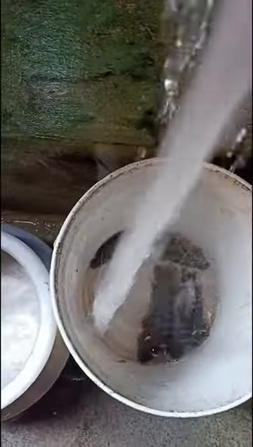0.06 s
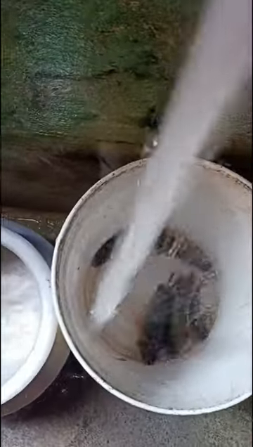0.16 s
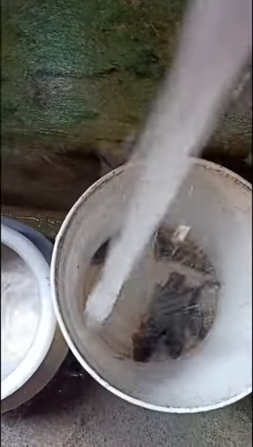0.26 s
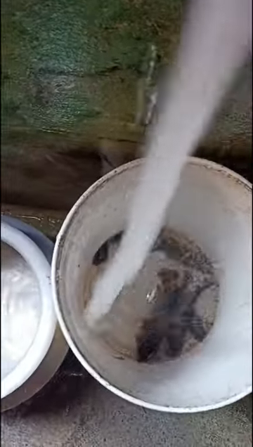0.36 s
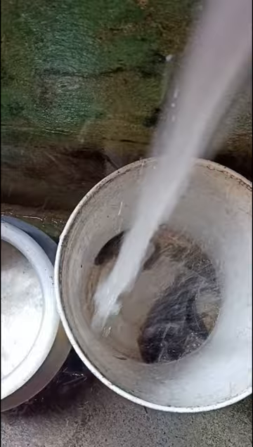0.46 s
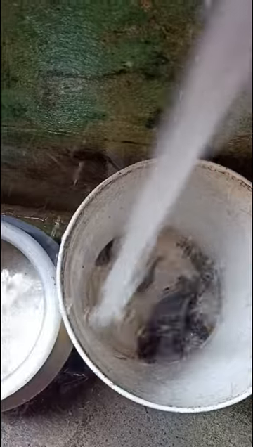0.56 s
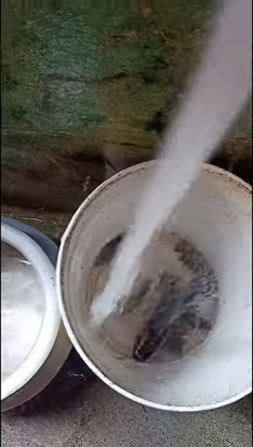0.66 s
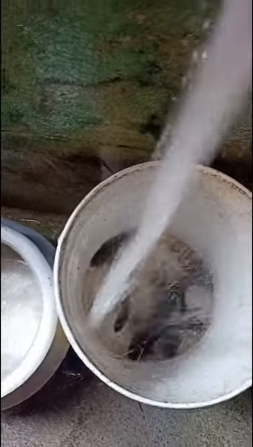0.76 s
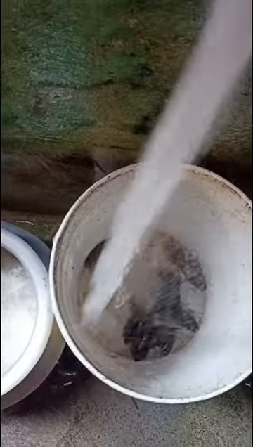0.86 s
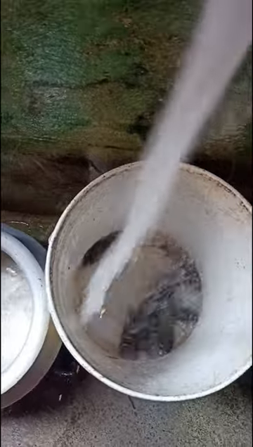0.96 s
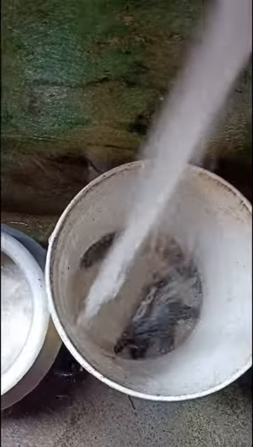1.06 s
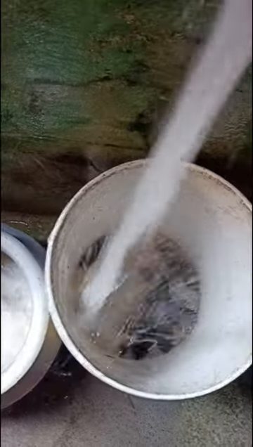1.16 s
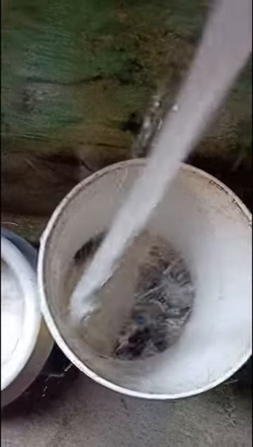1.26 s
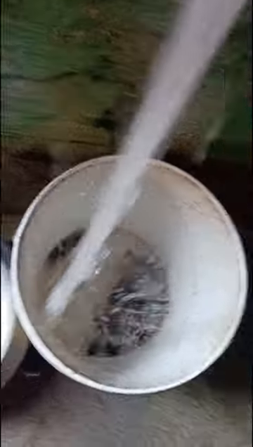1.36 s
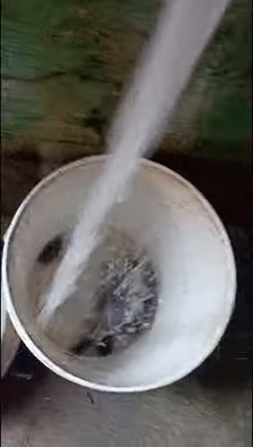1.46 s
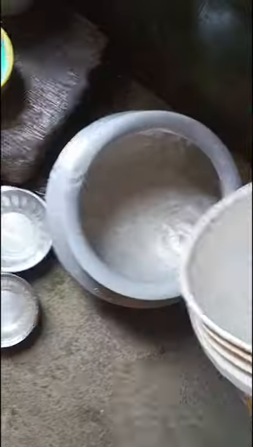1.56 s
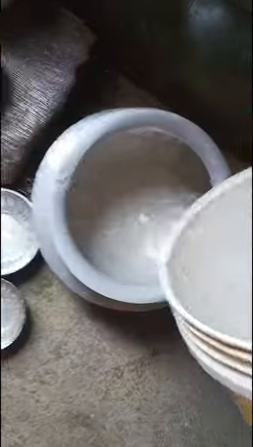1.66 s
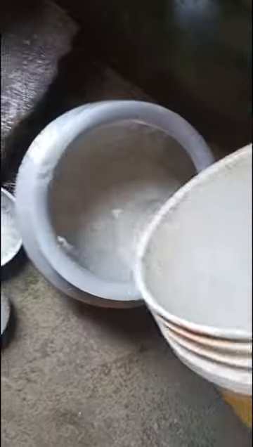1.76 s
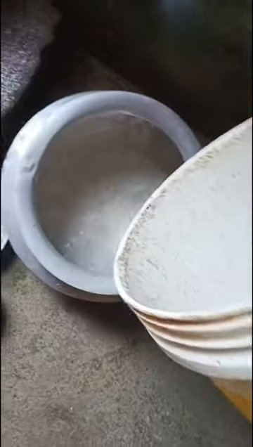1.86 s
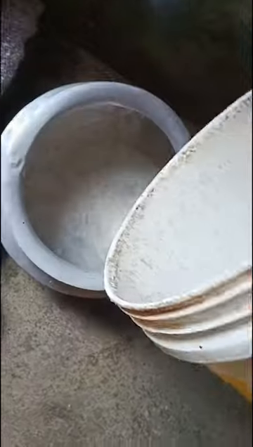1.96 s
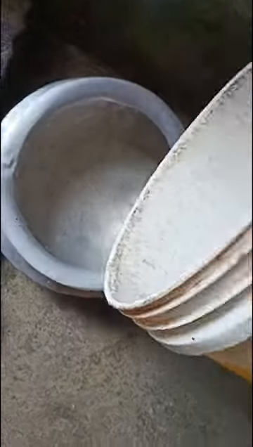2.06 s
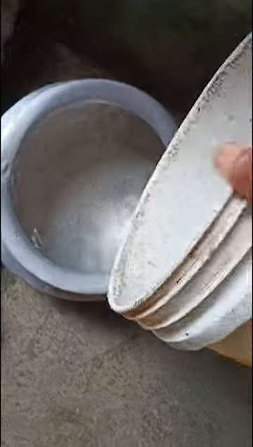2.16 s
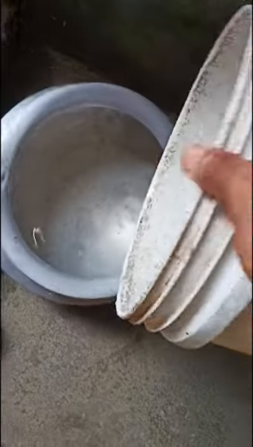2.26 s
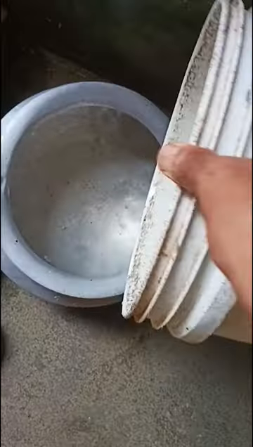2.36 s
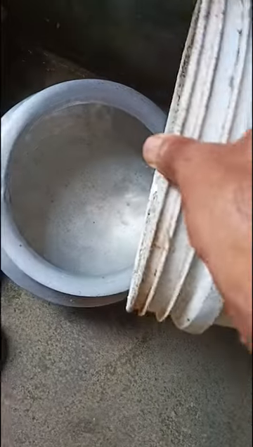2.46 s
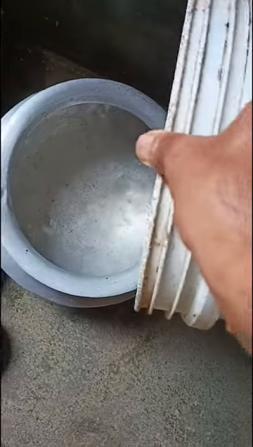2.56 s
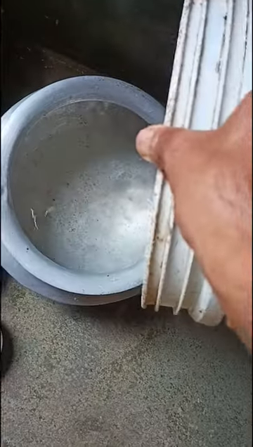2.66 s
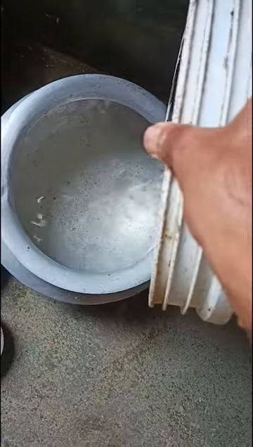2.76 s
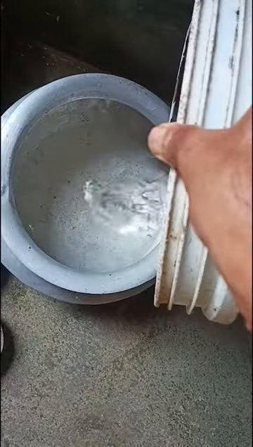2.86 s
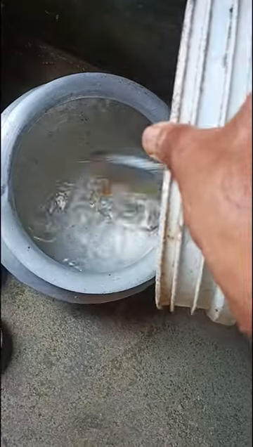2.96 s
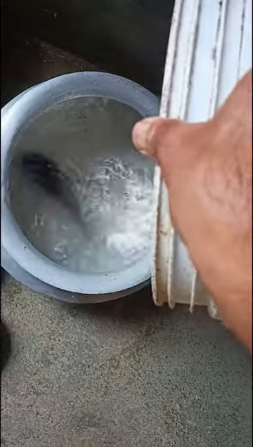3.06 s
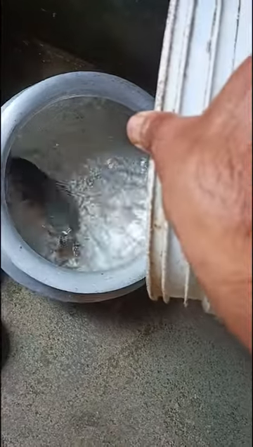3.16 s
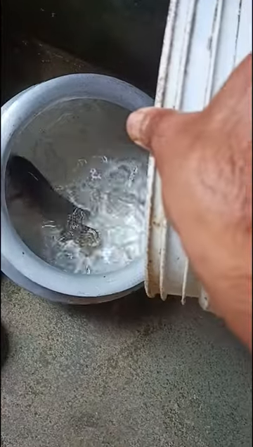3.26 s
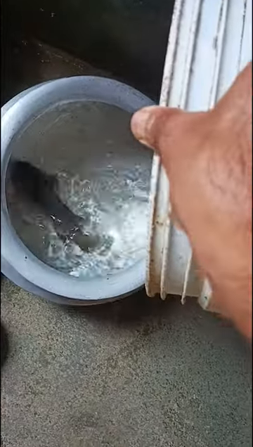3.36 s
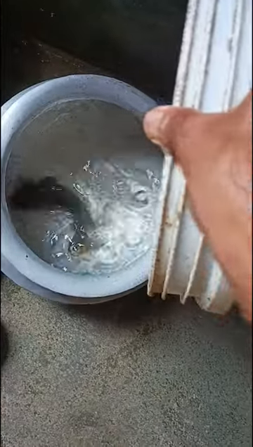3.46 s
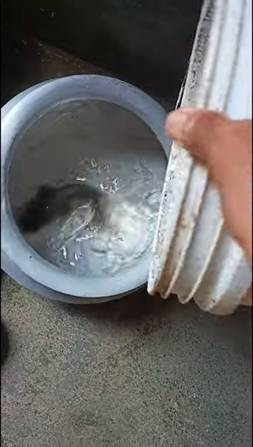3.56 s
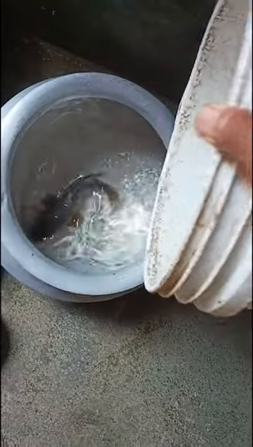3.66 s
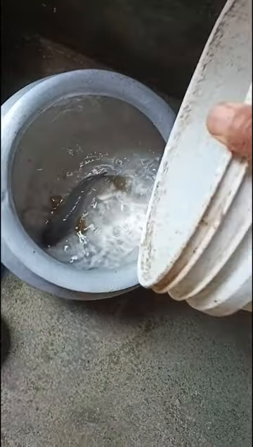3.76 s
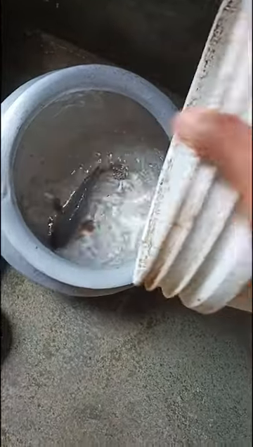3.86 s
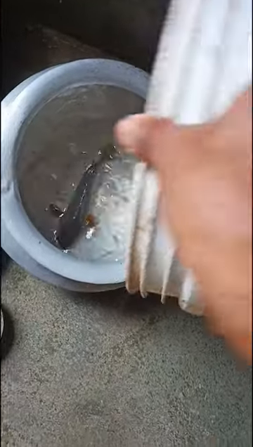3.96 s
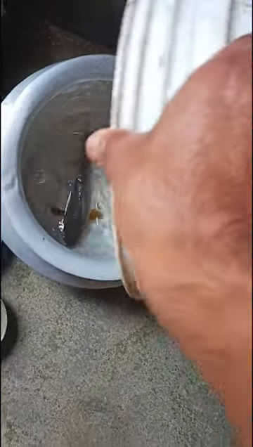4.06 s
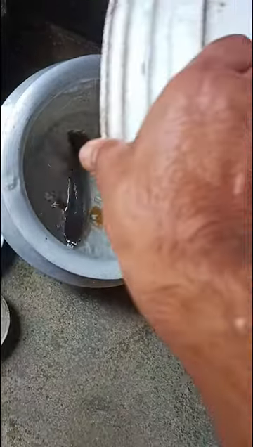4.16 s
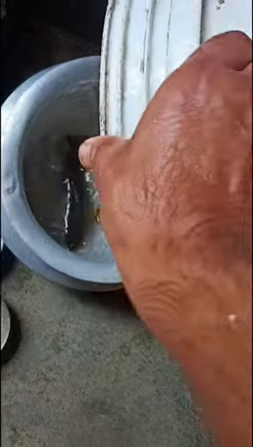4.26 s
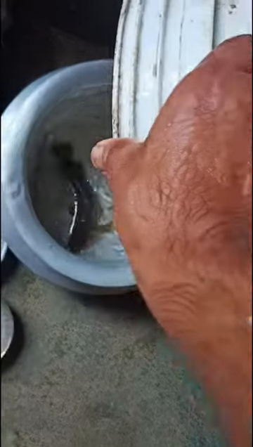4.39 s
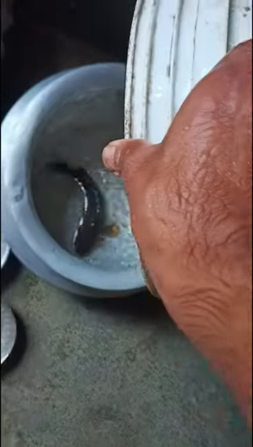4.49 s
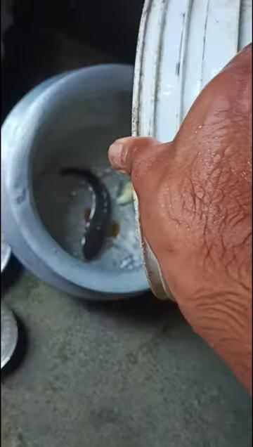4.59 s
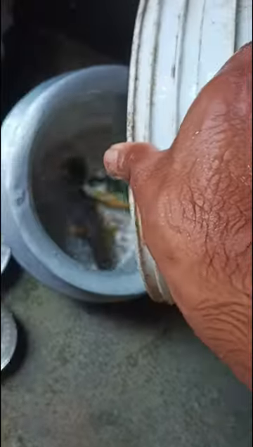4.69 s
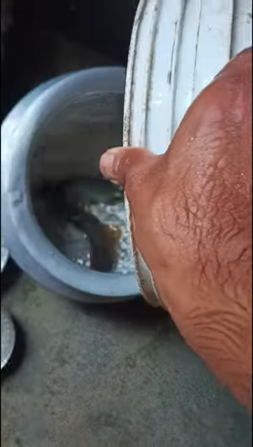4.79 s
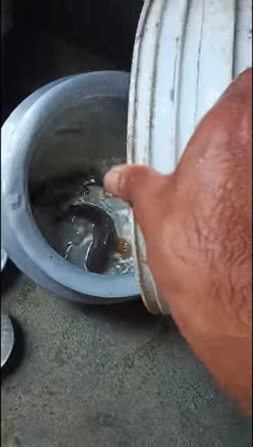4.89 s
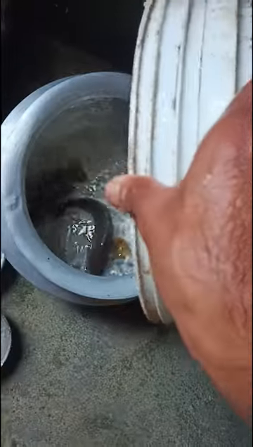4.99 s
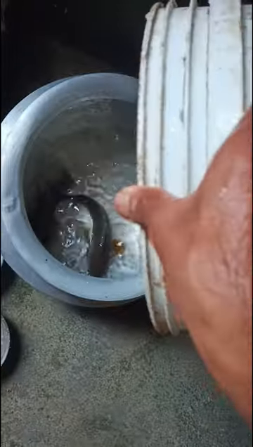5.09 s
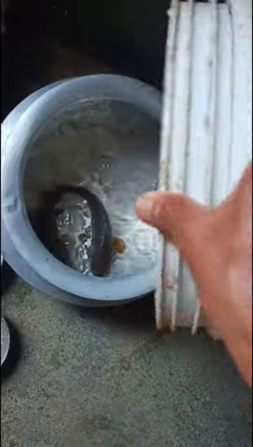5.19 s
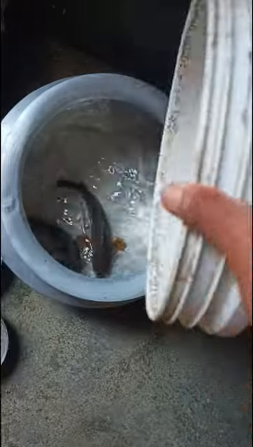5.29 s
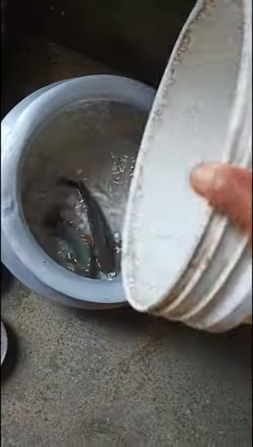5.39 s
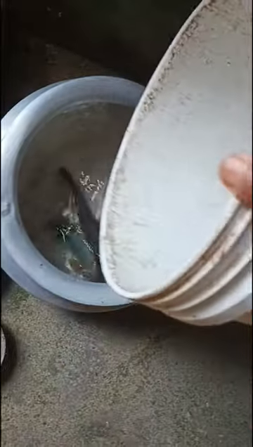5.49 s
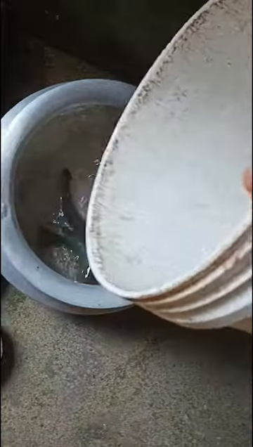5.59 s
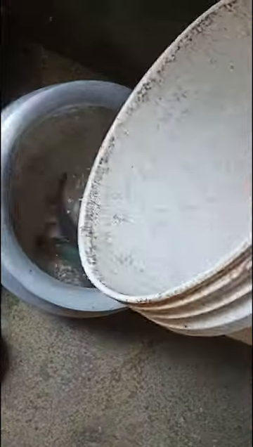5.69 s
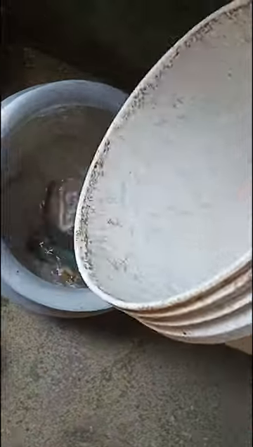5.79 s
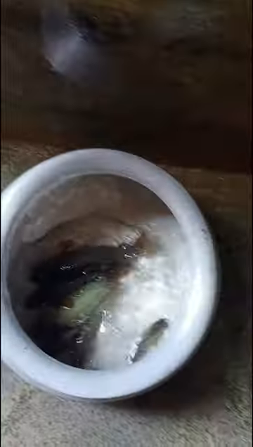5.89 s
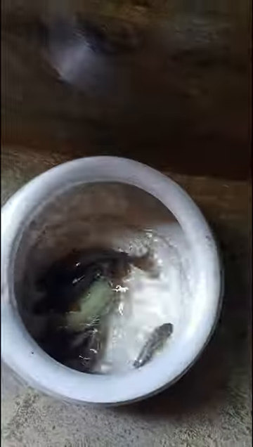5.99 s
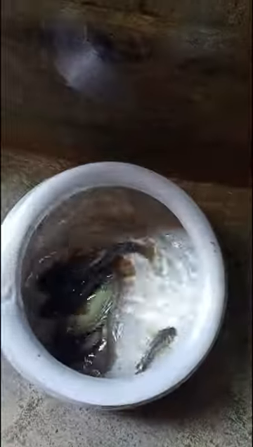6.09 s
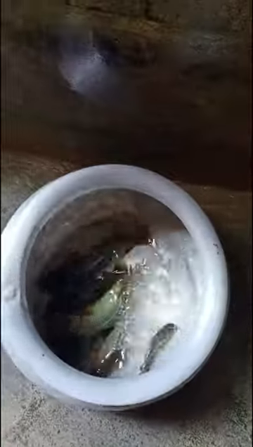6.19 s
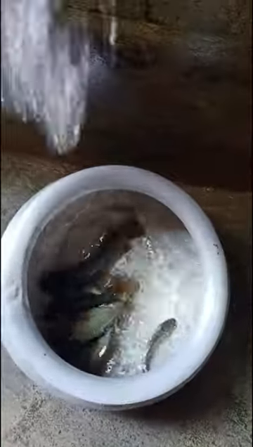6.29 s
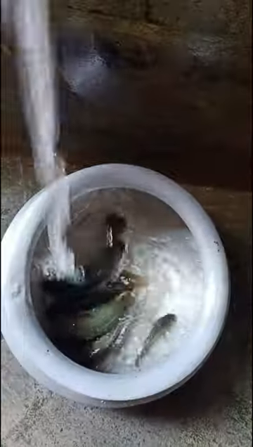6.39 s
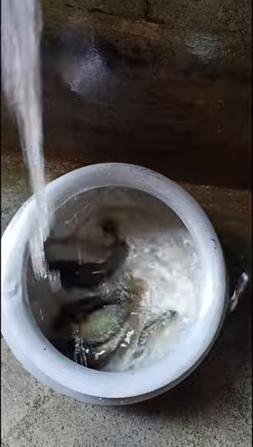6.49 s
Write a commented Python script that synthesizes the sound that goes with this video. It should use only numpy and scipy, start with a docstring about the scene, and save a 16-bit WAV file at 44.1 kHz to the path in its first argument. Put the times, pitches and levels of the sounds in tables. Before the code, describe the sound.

Close up in a small hard-walled space, a strong jet drums and hisses steadily in a plastic bucket, then stops abruptly. After a quiet gap the bucket rim scrapes a metal pot, water gushes in spurts, and fish thump and flap wetly against the metal, which rings faintly. Drops tick, and a thin stream starts pattering at the end.

```python
"""A jet of tap water drums into a plastic bucket of live fish, as shaped noise and bubbles; its sound stops
abruptly at 1.66 s. The bucket is then tipped over an aluminium pot: its rim chatters on the metal, and water
gushes out as clumped drop impacts and bubbles. Fish slide down, thump and flap as struck modes and wet bursts;
the metal rings as decaying modes and drops tick with rising bubbles. At the end a thin stream patters into the
pot."""
import sys
import numpy as np
from scipy import signal
from scipy.io import wavfile

SR = 44100
rng = np.random.default_rng(int(sys.argv[2]) if len(sys.argv) > 2 else 0)


def to_wav(s):
    """Save 16-bit WAV."""
    ch = np.atleast_2d(s).T  # columns
    pcm = np.round(np.clip(ch, -1, 1) * 32767)  # PCM
    wavfile.write(sys.argv[1], SR, pcm.astype(np.int16))


N = 288414
TIME = np.arange(N) / SR  # seconds, whole scene
RING = np.arange(SR // 2) / SR  # seconds, one half-second event

# In every table of a spectrum the level is relative: a later step sets the overall level.
# Still air. Each row: frequency in Hz, density in dB per Hz.
AIR_SPECTRUM = [(15, -67.5), (25, -28.5), (53, -3), (71, -13), (148, -23.5), (246, -18.5), (359, -25.5),
                (666, -26.5), (762, -27), (1020, -37), (1850, -38), (2420, -44.5), (4040, -43), (7700, -56),
                (15500, -53)]
# Thin hiss. Each row: frequency in Hz, density in dB per Hz.
HISS_SPECTRUM = [(5000, -34.5), (8000, -18), (10000, -25.5), (11400, 2), (12600, -12.5), (15500, -18)]
AIR_RMS_DB, HISS_RMS_DB = -63.5, -87.5
# Low rumble of handling the bucket. Each row: time in seconds, relative level in dB.
HANDLING_LEVEL = [(1.7, -62), (2.3, -69), (2.66, -48), (3.05, -66), (3.35, -42), (4.15, -56), (4.85, -54.5),
                  (5.2, -46), (6.0, -48), (6.54, -60.5)]

# Decay of the close walls' echo. Each row: frequency in Hz, t60 in seconds.
ROOM_DECAY = [(100, 0.41), (500, 0.21), (2000, 0.3), (6000, 0.33), (15000, 0.26)]
# Microphone response. Each row: frequency in Hz, gain in dB.
MIC_RESPONSE = [(15, -26.5), (40, -11), (65, -1), (120, 1.5), (15000, -1)]
EDGE_HZ = 15750  # band limit

# The jet's course. Each row: time in seconds, relative drumming level in dB, relative spray level in dB.
JET_LEVELS = [(0, -29, -32.5), (.3, -31, -34), (.55, -29, -33), (.85, -31, -33.5), (1.4, -31, -34),
              (1.65, -31.5, -34)]
JET_STOP_S = 1.659
# The bucket drumming under the jet. Each row: frequency in Hz, density in dB per Hz.
DRUM_SPECTRUM = [(21, -46.5), (35, -21), (97, -5.5), (166, -11.5), (338, -1), (419, -13), (510, -11),
                 (903, -16), (1180, -17.5), (1340, -21.5), (1540, -14.5), (1910, -37.5), (2500, -40),
                 (3250, -48), (5500, -120)]
# The jet's spray. Each row: frequency in Hz, density in dB per Hz.
SPRAY_SPECTRUM = [(1180, -44), (2000, -12.5), (2350, -8.5), (2770, -7.5), (3120, -10.5), (3940, -4),
                  (4320, -9), (4880, -4), (5540, -10), (7680, -14.5), (9590, -7), (11200, 2), (11800, -2),
                  (12700, -13.5), (15500, -22)]
# Resonances of the standing bucket. Each row: frequency in Hz, width in Hz, lift in dB.
BUCKET_RESONANCES = [(358, 130, 3.5), (483, 100, 4), (1200, 85, 7), (1550, 150, 7), (1778, 180, 15.5),
                     (2057, 29, 10.5), (2830, 450, 2), (3590, 60, 6.5), (4300, 850, 1), (5000, 77, 0)]
# The heaviest slugs of water in the jet. Each row: start in seconds, relative peak in dB.
JET_SLUGS = [(0.08, -19), (0.257, -20), (0.379, -23), (0.712, -19.5), (0.83, -24), (1.045, -22.5),
             (1.076, -22.5), (1.287, -20), (1.384, -21.5)]

# Gushes from the tipped bucket. Each row: start in seconds, length in seconds,
# then relative levels in dB of the slosh, the splash, the fine spray and the thin hiss.
GUSH_EVENTS = [(2.358, 0.04, -61, -76.5, -98, -100), (2.484, 0.17, -52, -63, -74, -78),
               (2.567, 0.19, -48.5, -54.5, -69, -79), (3.089, 0.19, -63.5, -59, -59.5, -77),
               (3.235, 0.03, -33.5, -47, -60, -57), (3.274, 0.036, -35, -36.5, -49.5, -72),
               (3.442, 0.19, -41, -53.5, -57, -69), (3.708, 0.13, -53.5, -59.5, -68, -79),
               (3.921, 0.23, -55.5, -67, -76, -80), (4.294, 0.03, -41, -35.5, -57.5, -80),
               (4.48, 0.14, -58, -61, -67.5, -74.5), (4.876, 0.24, -49.5, -51.5, -63.5, -75),
               (5.168, 0.22, -45.5, -51.5, -63.5, -82), (5.551, .19, -46, -58.5, -66.5, -79),
               (5.901, .07, -56, -60, -67.5, -65.5)]
GUSH_RISE_S, GUSH_SAG_DB_PER_S = 0.021, 20
SLOSH_T60_S, SPLASH_T60_S, SPRAY_T60_S, MIST_T60_S = 0.4, 0.51, 1, 0.58  # how each part settles after a gush
# Water sloshing over the rim. Each row: frequency in Hz, density in dB per Hz.
SLOSH_SPECTRUM = [(41, -15.5), (70, -12), (134, -4), (215, 3.5), (284, -2), (445, -3), (613, -3.5),
                  (727, -30.5), (900, -19.5), (1170, -44), (1980, -120)]
# Water splashing in the pot. Each row: frequency in Hz, density in dB per Hz.
SPLASH_SPECTRUM = [(410, -34.5), (700, -2), (868, -12.5), (948, -4.5), (1270, -10.5), (1380, -7.5),
                   (2070, -17), (2920, -24), (3500, -43), (4550, -72), (7700, -120)]
# Fine spray and ticking drops. Each row: frequency in Hz, density in dB per Hz.
FIZZ_SPECTRUM = [(1500, -19.5), (2500, -2.5), (3700, 2), (5200, 1), (6500, -8), (8000, -9), (11300, 1),
                 (12600, -18.5), (15500, -58)]
# Drops thrown by the spray; their peak stands STRAY_DB above the spray's envelope.
STRAY_DROPS_PER_S, STRAY_DB, STRAY_LOW_HZ, STRAY_HIGH_HZ = 17, 13, 2640, 5150

# Fish thumping: the first in the bucket under the jet, the rest in the pot. Each row: start in seconds, # knock
# peak in dB, knock frequency in Hz, peak of the floor's boom in dB.
FISH_THUMPS = [(1.58, -32.5, 90.7, -38), (2.492, -31.5, 210, -51), (2.584, -28.5, 356, -67),
               (2.738, -36, 263, -37), (3.248, -14.5, 420, -30), (3.263, -22, 231, -41),
               (3.479, -15.5, 515, -30.5), (3.596, -24, 466, -34.5), (3.736, -37, 463, -36.5),
               (4.049, -35, 295, -34), (4.365, -18, 480, -11), (4.406, -23, 306, -36),
               (4.482, -31.5, 232, -31.5), (4.749, -41, 162, -46), (4.898, -40, 230, -37.5),
               (4.995, -39.5, 208, -40), (5.142, -24, 275, -18), (5.284, -34, 186, -25),
               (5.360, -29, 223, -32.5), (5.676, -41, 222, -39), (5.752, -39.5, 126, -37.5),
               (5.939, -32.5, 107, -32)]
# Modes a thump wakes in the wall. Each row: frequency in Hz, relative level in dB, t60 in seconds.
WALL_MODES = [(185.4, 1.5, 0.053), (222, -8, 0.074), (320, 2, 0.046), (403, -3, 0.0083), (477, -0.5, 0.05),
              (644, -1.5, 0.054), (920, -54, 0.052), (1167, -6, 0.022), (1480, -21, 0.068)]
# A small wall radiates little bass. Each row: frequency in Hz, gain in dB.
WALL_RADIATION = [(30, -21), (80, -13), (120, -12.5), (170, 2), (15000, -8)]
KNOCK_CYCLES = 20  # a struck spot falls by 60 dB within this many swings
BOOM_HZ, BOOM_T60_S, BOOM_DELAY_S = 191, 0.038, 0.00462  # the floor gives a moment after the knock

# Wet slaps of tails and falling water. Each row: start in seconds, relative peak in dB,
# relative level of the fine spray in dB.
WET_SLAPS = [(2.614, -32, -55), (2.737, -34.5, -68), (3.238, -42, -44.5), (3.479, -24, -65),
             (4.05, -23, -54), (4.47, -27, -56.5), (4.923, -26.5, -47), (4.988, -31.5, -62),
             (5.037, -29, -53), (5.147, -22, -69), (5.185, -23.5, -52), (5.23, -32, -61), (5.255, -42, -69),
             (5.292, -27, -75), (5.363, -19, -46), (5.573, -29, -73), (5.622, -29.5, -61),
             (5.709, -33, -70), (5.965, -40, -68)]
# A wet slap. Each row: frequency in Hz, density in dB per Hz.
SLAP_SPECTRUM = [(80, -55), (170, -22.5), (280, 1), (420, 7.5), (680, 3.5), (1100, 1.5), (1600, -2),
                 (2000, -13.5), (2500, -18.5), (4500, -22.5), (7000, -68), (15000, -43)]
SLAP_T60_S, SLAP_HALVING_DB = 0.075, 8  # t60 at a table peak of -30 dB; a slap this much harder is half as long

# The rim scraping over the pot. Each row: start in seconds, rms level in dB, length in seconds,
# t60 in seconds of the dying chatter.
RIM_SCRAPES = [(2.47, -43, 0.031, 0.024), (2.493, -39.5, 0.011, 0.026), (2.615, -50, 0.025, 0.049),
               (4.296, -33, 0.013, 0.022), (4.303, -32.5, 0.023, 0.085)]
# The chattering rim. Each row: frequency in Hz, density in dB per Hz.
RIM_SPECTRUM = [(70, -10), (170, -5), (480, 1), (700, -3.5), (1100, 3), (1700, -6), (2600, -16),
                (4400, -12.5), (6500, -28.5), (10000, -36), (12000, -28), (15000, -79)]
# Modes of the pot's metal. Each row: frequency in Hz, relative level in dB, t60 in seconds.
POT_MODES = [(452, -2, .35), (581, -8, .8), (922, -9, .3), (1115, -3, .1), (1620, -5, .14), (1957, -3, .5),
             (2090, -8, .3), (2210, -8, .12), (2372, -8, .22), (2530, -12, .2), (3065, -6, .3),
             (3214, -5, .15), (3480, -5, .22), (3730, -6, .13), (4005, -3, .13), (4130, -7, .15),
             (4425, -6, .18), (4540, -6, .18), (5211, -3, .22), (5440, -6, .14), (5960, -5, .14),
             (9600, -2, .14)]
# Taps that leave the metal singing. Each row: start in seconds, peak in dB,
# frequency in Hz above which the contact wakes the modes ever less.
METAL_TAPS = [(2.495, -44, 3300), (3.04, -52.5, 1500), (3.2, -56, 650), (3.92, -50, 650), (4.31, -36, 4200),
              (5.365, -43, 2640)]
# The bucket bumping the pot as the fish start to slide.
# Each row: frequency in Hz, relative level in dB, t60 in seconds.
BUMP_MODES = [(377, -15, 0.2), (433, 14, 0.055), (502, -2.5, 0.44), (581, -8.5, 0.89), (910, -18, 0.24),
              (1427, -9, 0.19), (1575, -11, 0.12)]
BUMP_S, BUMP_PEAK_DB = 3.121, -31
# Large bubbles gulping in the pot. Each row: start in seconds, peak in dB, t60 in seconds.
BUBBLE_GULPS = [(3.523, -32.5, 0.13), (3.605, -48, 0.27), (4.554, -38, .14)]
GULP_HZ, GULP_WOBBLE = 920, 0.042  # wobble: rms share of the frequency

# The loudest drops. Each row: start in seconds, relative peak in dB, nominal bubble frequency in Hz.
LOUD_DRIPS = [(3.042, -59, 1600), (3.088, -56, 4450), (3.244, -45.5, 5000), (3.383, -43, 3800),
              (3.435, -41, 5140), (3.521, -48.5, 3900), (3.561, -46.5, 5650), (3.595, -45.5, 3950),
              (3.849, -53, 1260), (4.56, -54.5, 4900), (4.621, -56, 5370), (4.828, -55, 4200),
              (4.906, -59, 3440), (5.115, -52, 5900), (6.29, -60.5, 1420), (6.35, -57, 1340),
              (6.388, -53.5, 4530)]
# The thin stream into the pot. Each row: time in seconds, relative level in dB.
STREAM_LEVEL = [(6.28, -77), (6.375, -77), (6.39, -57.5), (6.54, -51)]
# The stream's patter. Each row: frequency in Hz, density in dB per Hz.
TRICKLE_SPECTRUM = [(240, -25), (400, -16), (503, -3), (772, -15), (914, 5.5), (1080, -24), (1630, -4.5),
                    (2030, -15), (3250, -14.5), (3680, -11), (7910, -20.5), (11200, -6), (15500, -47)]


def amp(db):
    """Definition of the decibel: level to amplitude gain."""
    return 10 ** (np.asarray(db) / 20)


def unit(x):
    """Normalisation by mean power: scales to rms 1."""
    return x / np.sqrt(np.mean(x ** 2) + 1e-20)


def peaked(x, db):
    """Normalisation by peak: scales the largest excursion to a level in dB."""
    return amp(db) * x / abs(x).max()


def read(points, hz):
    """Logarithmic pitch: interpolates a table on a log-frequency axis."""
    f, value = np.transpose(points)
    return np.interp(np.log(hz + 1), np.log(f + 1), value)


def add(mix, s, sound):
    """Superposition: mixes a sound in at time s, in place."""
    part = mix[max(round(s * SR), 0):][:len(sound)]
    part += sound[:len(part)]


def dying(t60, age=RING):
    """Exponential damping: a fall of 60 dB in t60 seconds."""
    return np.exp(-np.log(1000) * age / max(t60, 1e-3))


def ring(modes):
    """Modal superposition: the answer of a set of damped modes to a click."""
    return sum(amp(db) * dying(t60) * np.sin(2 * np.pi * hz * RING) for hz, db, t60 in modes)


def through(x, answer):
    """Convolution: passes x through an impulse response."""
    return signal.fftconvolve(x, answer)[:len(x)]


def colour(x, spectrum, resonances=(), size=4096):
    """Minimum-phase filtering: a causal broad spectrum with narrow resonances on top."""
    hz = abs(np.fft.fftfreq(size, 1 / SR))
    db = read(spectrum, hz)
    for f, width, lift in resonances:
        db = db + lift / (1 + (2 * (hz - f) / width) ** 2)
    log_gain = np.log(amp(np.maximum(db, -100)))
    response = np.exp(np.conj(signal.hilbert(log_gain)))  # phase follows from the log gain
    return through(x, np.fft.ifft(response).real)


def patter(per_s, spread_db, clump_db, clump_s, wash):
    """Random impacts: drops of uneven size arrive in clumps, over a wash of countless tiny ones."""
    size = amp(spread_db * np.minimum(rng.exponential(1, N), 4)) * rng.choice([-1, 1], N)
    lands = rng.random(N) < per_s / SR
    drops = unit(size * lands) + wash * rng.standard_normal(N)
    window = signal.windows.hann(int(2 * clump_s * SR) + 3)
    clumps = unit(through(rng.standard_normal(N), window))
    return unit(drops * amp(clump_db * np.clip(clumps, -2, 2)))


def bubbling(per_s, low_hz, high_hz, t60_at_1k, count=6000):
    """Bubble resonance: trapped air rings briefly with a rising pitch; small bubbles are higher and die sooner."""
    out, t = np.zeros(N), RING[:2000]
    gap, size, strength = rng.random((count, 3)).T
    starts = np.cumsum(-np.log(1 - gap)) / per_s
    keep = starts < N / SR
    hz = (low_hz + (high_hz - low_hz) * size[keep])[:, None]
    life = t60_at_1k * np.sqrt(1000 / hz)
    rise = 1 + 0.049 * np.minimum(t / life, 1)
    rings = np.sin(2 * np.pi * hz * t * rise) * np.exp(-np.log(1000) * t / life) / np.sqrt(life)
    for s, sound in zip(starts[keep], rings * amp(-18 * strength[keep])[:, None]):
        add(out, s, sound)
    return unit(out)


def room(x, wet_db):
    """Reverberation: adds the short echo of close walls, sparse taps that decay at a rate set by frequency."""
    signs = rng.choice([-1., 1.], len(RING))
    taps = signs * (rng.random(len(RING)) < 3000 / SR) * (RING > .005)
    hz, t, z = signal.stft(taps, SR, nperseg=256)
    decay = np.exp(-np.log(1000) * t / read(ROOM_DECAY, hz)[:, None])
    tail = signal.istft(z * decay, SR, nperseg=256)[1]
    return x + amp(wet_db) * through(x, tail / np.linalg.norm(tail))


def background():
    """Broadband noise: still air, a steady thin hiss and the low rumble of handling."""
    air = amp(AIR_RMS_DB) * unit(colour(patter(2100, 1.8, 1.0, 0.032, 1), AIR_SPECTRUM))
    hiss = amp(HISS_RMS_DB) * unit(colour(rng.standard_normal(N), HISS_SPECTRUM))
    rumble_spectrum = [(20, -20), (45, -6), (68, -3.0), (105, -3.5), (160, -13), (400, -50.5)]  # (Hz, dB per Hz)
    rumble = unit(colour(rng.standard_normal(N), rumble_spectrum))
    s, db = np.transpose(HANDLING_LEVEL)
    handling = amp(np.interp(TIME, s, db, left=-120, right=-120) - 8.0)
    return air + hiss + handling * rumble


def stream():
    """Droplet impact: a thin stream patters on the inside of the pot and entrains bubbles."""
    s, db = np.transpose(STREAM_LEVEL)
    level = amp(np.interp(TIME, s, db) - 1.5) * (TIME > s[0])
    impacts = patter(3000, 4.1, 1.0, 0.026, 0.51) + .5 * bubbling(800, 1200, 6100, 0.023)
    return level * unit(colour(impacts, TRICKLE_SPECTRUM))


def drip(peak_db, hz):
    """Air entrainment: a drop ticks and traps a few tiny bubbles whose pitch rises as they surface."""
    drop = colour(.5 * rng.standard_normal(len(RING)) * dying(0.076), FIZZ_SPECTRUM)
    for delay, size, strength in rng.random(size=(4, 3)):
        bubble_hz = hz * (.8 + 0.351 * size)
        bubble = np.sin(2 * np.pi * bubble_hz * RING * (1 + 3 * RING)) * dying(0.031)
        add(drop, 0.0043 * delay, strength * bubble)
    return peaked(drop, peak_db)


def drips():
    """Drop impact: the large drops fall back into the pot."""
    out = np.zeros(N)
    for s, db, hz in LOUD_DRIPS:
        add(out, s, drip(db + 6.0, hz))
    return out


def stray_drops(spray, count=70):
    """Random arrival: small drops land at uneven intervals and follow the level of the spray that threw them."""
    out, s = np.zeros(N), GUSH_EVENTS[0][0]
    for gap, size in rng.random((count, 2)):
        s += 2 * gap / STRAY_DROPS_PER_S
        hz = STRAY_LOW_HZ + size * (STRAY_HIGH_HZ - STRAY_LOW_HZ)
        add(out, s, np.interp(s, TIME, spray) * drip(STRAY_DB, hz))
    return out


def taps():
    """Contact stiffness: the pot rings on after a tap, and a soft one wakes mainly its low modes."""
    out = np.zeros(N)
    fade = np.minimum(RING / .004, 1) * (1 - (RING / RING[-1]) ** 2)
    for s, db, top_hz in METAL_TAPS:
        modes = [(hz, level - 20 * np.log10(1 + (hz / top_hz) ** 4), t60) for hz, level, t60 in POT_MODES]
        add(out, s, peaked(fade * ring(modes), db))
    return out


def tone_swell():
    """Build-up of a resonance: a quick rise, then a slow straight fade to silence."""
    return (1 - np.exp(-RING / 0.008)) * (1 - RING / RING[-1])


def bump():
    """Modal ringing: the bucket bumps the pot with a hollow ring."""
    out = np.zeros(N)
    add(out, BUMP_S, peaked(tone_swell() * ring(BUMP_MODES), BUMP_PEAK_DB))
    return out


def gulps():
    """Frequency modulation: large bubbles swell quickly and waver in pitch as the water moves."""
    out = np.zeros(N)
    for s, db, t60 in BUBBLE_GULPS:
        waver = unit(through(rng.standard_normal(len(RING)), signal.windows.hann(300)))
        turns = np.cumsum(GULP_HZ * (1 + GULP_WOBBLE * waver)) / SR
        add(out, s, peaked(tone_swell() * dying(t60) * np.sin(2 * np.pi * turns), db))
    return out


def scrapes():
    """Friction: the plastic rim chatters across the pot's lip while it is pressed, then dies away."""
    out = np.zeros(N)
    for s, db, length, t60 in RIM_SCRAPES:
        chatter = unit(colour(patter(1600, 1.15, 0.65, 0.0046, 1.0)[:len(RING)], RIM_SPECTRUM))
        pressure = np.minimum(RING / 0.0029, 1) * dying(t60, np.maximum(RING - length, 0))
        add(out, s, amp(db) * chatter * pressure)
    return out


def jet():
    """Turbulent impact: the jet drums on the bucket, drives bubbles under and hisses; slugs strike harder."""
    s, drum_db, spray_db = np.transpose(JET_LEVELS)
    impacts = patter(1500, 3.1, 1.0, 0.012, .55) + 0.18 * bubbling(300, 159, 2546, 0.02)
    droplets = patter(2500, 3, 1.7, .005, .75) + .45 * bubbling(850, 2000, 12000, .04)
    drum = unit(colour(impacts, DRUM_SPECTRUM, BUCKET_RESONANCES))
    drum *= amp(np.interp(TIME, s, drum_db) - 7.0)
    spray = unit(colour(droplets, SPRAY_SPECTRUM, BUCKET_RESONANCES))
    spray *= amp(np.interp(TIME, s, spray_db) - 6.5)
    surge = np.minimum(RING / 0.0026, 1) * dying(0.11)
    for start, db in JET_SLUGS:
        burst = rng.standard_normal(len(RING)) * surge
        add(drum, start, peaked(colour(burst, DRUM_SPECTRUM, BUCKET_RESONANCES), db - 2))
        add(spray, start, peaked(colour(burst, SPRAY_SPECTRUM, BUCKET_RESONANCES), db - 6))
    # an abrupt stop with a faint, slower remainder
    since_stop = np.maximum(TIME - JET_STOP_S, 0)
    stop = np.exp(-since_stop / 0.00072) + amp(-20.0) * np.exp(-since_stop / 0.015)
    return (drum + spray) * stop


def flow(starts, lengths, dbs, t60):
    """Addition of powers: each gush wells up, sags throughout and settles once its length is over."""
    power = np.zeros(N)
    for s, length, db in zip(starts, lengths, dbs):
        age = np.maximum(TIME - s, 0)
        settling = dying(t60, np.maximum(age - length, 0))
        sagging = amp(db - GUSH_SAG_DB_PER_S * age)
        power += (np.minimum(age / GUSH_RISE_S, 1) * sagging * settling) ** 2
    return np.sqrt(power)


def pour():
    """Splash noise: water gulps over the rim, splashes in the pot, throws bubbly spray and leaves a thin hiss."""
    s, length, slosh_db, splash_db, spray_db, mist_db = np.transpose(GUSH_EVENTS)
    slosh = flow(s, length, slosh_db, SLOSH_T60_S)
    splash = flow(s, length, splash_db, SPLASH_T60_S)
    spray = flow(s, length, spray_db, SPRAY_T60_S)
    mist = flow(s, length, mist_db, MIST_T60_S)
    large_bubbles = .9 * bubbling(300, 600, 3500, .03)
    tiny_bubbles = .8 * bubbling(500, 2500, 8000, .035)
    low = slosh * amp(4) * unit(colour(patter(700, 5.6, 4.4, 0.008, 0.2), SLOSH_SPECTRUM))
    splashing = patter(760, 1.4, 1.0, 0.0031, 0.52) + large_bubbles
    mid = splash * amp(2.5) * unit(colour(splashing, SPLASH_SPECTRUM))
    spraying = patter(1600, 1.3, 3.2, 0.0021, 0.6) + tiny_bubbles
    high = spray * amp(-4.5) * unit(colour(spraying, FIZZ_SPECTRUM))
    hiss = mist * amp(2.0) * unit(colour(patter(3200, 5.3, 0.98, 0.012, 0.24), HISS_SPECTRUM))
    return low + mid + high + hiss + stray_drops(spray)


def slaps():
    """Water impact: a smack, a quick cloud of droplets and bubbles, and spray that hangs a little longer."""
    out = np.zeros(N)
    drops = patter(2700, 2.5, 0.33, 0.0006, 1.0) + .5 * bubbling(900, 471, 2680, 0.041)
    droplets = patter(2700, 4.5, 0.93, 0.0041, .6) + 0.7 * bubbling(900, 2035, 7160, 0.068)
    spray = unit(colour(droplets, FIZZ_SPECTRUM))
    swell = np.minimum(RING / 0.0059, 1)
    smack = amp(13) * signal.unit_impulse(len(RING), round(0.00204 * SR))
    resonances = [(940, 64, 9.6), (1170, 89, 8.6), (1516, 37, 6.8)]  # (Hz, width Hz, lift dB)
    for s, db, spray_db in WET_SLAPS:
        t60 = SLAP_T60_S * 2 ** (-(db + 30) / SLAP_HALVING_DB)
        now = slice(round(s * SR), round(s * SR) + len(RING))
        cloud = drops[now] * swell * dying(t60) + smack
        add(out, s, peaked(colour(cloud, SLAP_SPECTRUM, resonances), db - 3.5))
        add(out, s, amp(spray_db + 1.5) * spray[now] * swell * dying(1.22 * t60))
    return out


def blow(hz, t60, db):
    """Contact time: a soft body pushes and releases the wall; a slower blow wakes lower modes."""
    cycles = hz * RING
    phase = cycles / 0.089
    push = phase * (2 - phase) * np.exp(-phase)
    swing_up = 1 - np.exp(-(cycles / 0.45) ** 2)  # within about a cycle
    spot = np.sin(2 * np.pi * cycles) * dying(t60) * swing_up
    wall = unit(through(push, ring(WALL_MODES)))
    return peaked(unit(colour(spot, WALL_RADIATION)) + .5 * wall, db)


def thumps():
    """Impact on a shell: a fish knocks the wall, then its weight makes the vessel's floor boom."""
    out = np.zeros(N)
    for s, knock_db, hz, boom_db in FISH_THUMPS:
        add(out, s, blow(hz, KNOCK_CYCLES / hz, knock_db))
        add(out, s + BOOM_DELAY_S, blow(BOOM_HZ, BOOM_T60_S, boom_db))
    return out


def scene():
    """Sympathetic resonance: blows, water and the rim all ring the pot's metal, the hard rim most of all."""
    blows, water, rim = thumps(), pour() + slaps() + stream(), scrapes()
    metal = ring(POT_MODES)
    drive = amp(-21.5) * water + amp(-10.0) * rim + amp(-53) * blows
    singing = through(drive, metal / np.linalg.norm(metal))
    wet_sounds = water + rim + singing + bump() + gulps() + taps()
    in_vessel = room(blows, -8) + room(wet_sounds, -7) + room(drips(), -8.5)
    return (jet() + in_vessel + background())[None]


def record(dry):
    """Transducer response: a small microphone loses the deep bass, then the band is limited."""
    heard = colour(dry[0], MIC_RESPONSE)
    low_pass = signal.firwin(511, EDGE_HZ, window=("kaiser", 9), fs=SR)
    return signal.oaconvolve(heard, low_pass, "same")[None]


dry = scene()
out = record(dry)
to_wav(out)
```